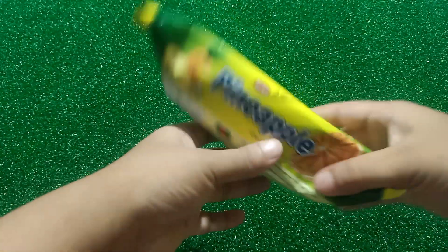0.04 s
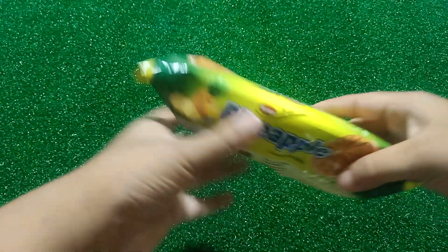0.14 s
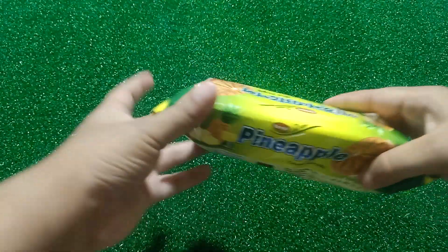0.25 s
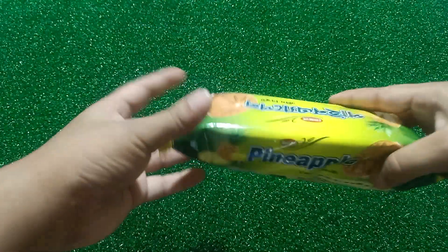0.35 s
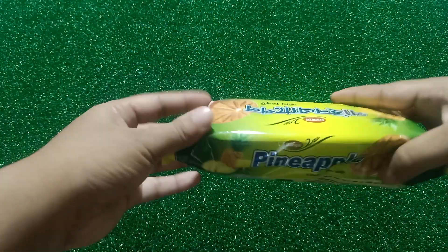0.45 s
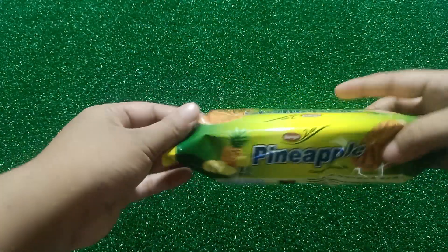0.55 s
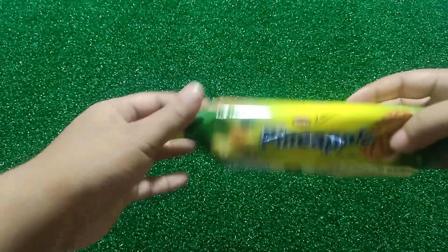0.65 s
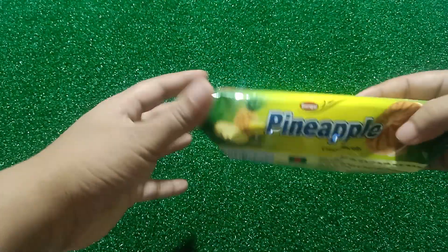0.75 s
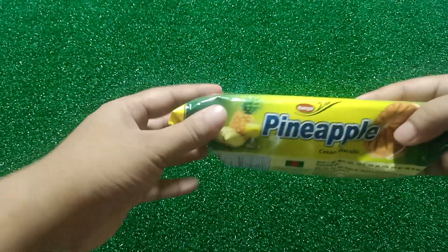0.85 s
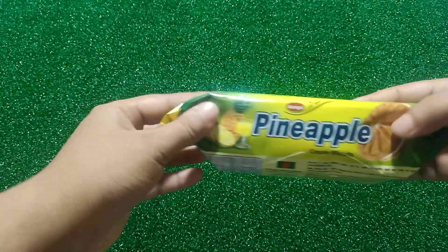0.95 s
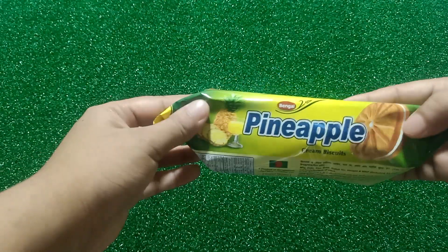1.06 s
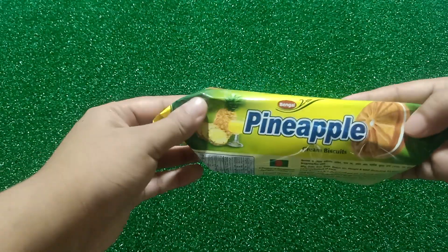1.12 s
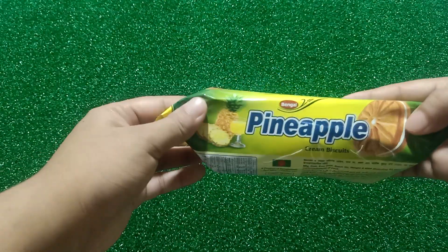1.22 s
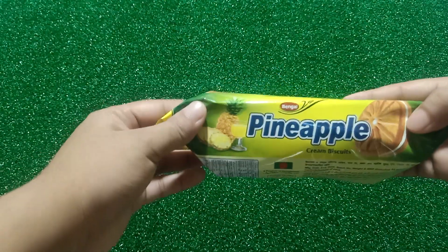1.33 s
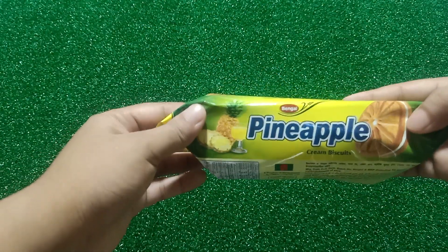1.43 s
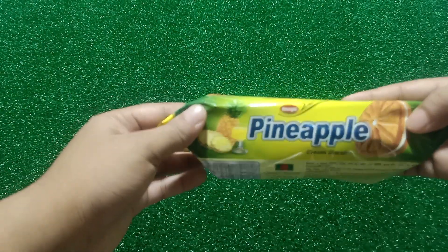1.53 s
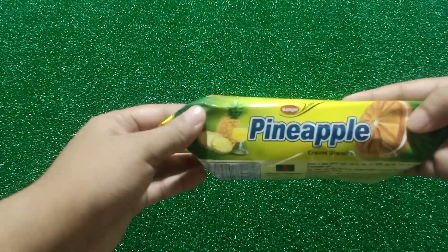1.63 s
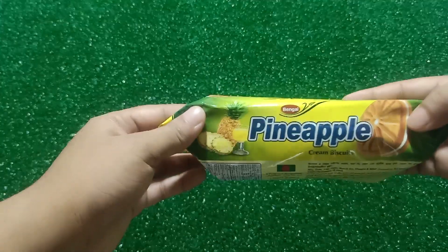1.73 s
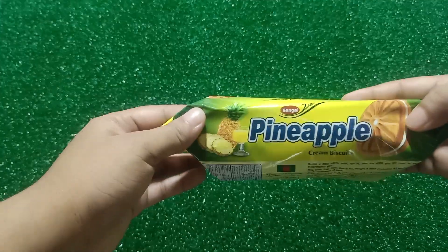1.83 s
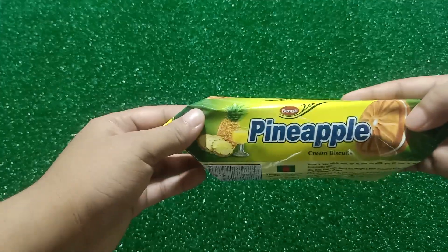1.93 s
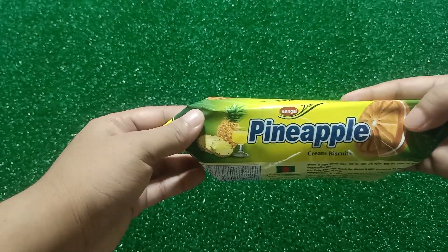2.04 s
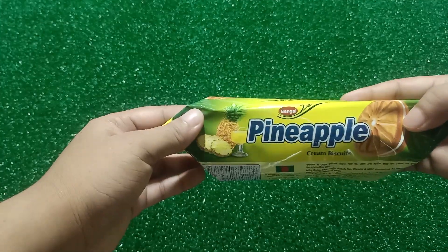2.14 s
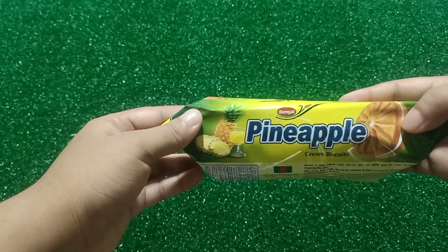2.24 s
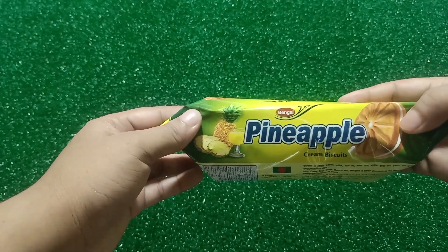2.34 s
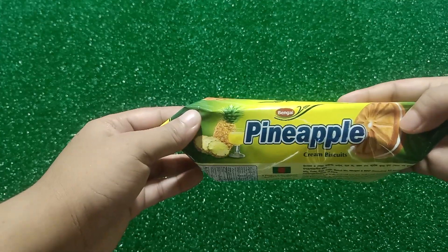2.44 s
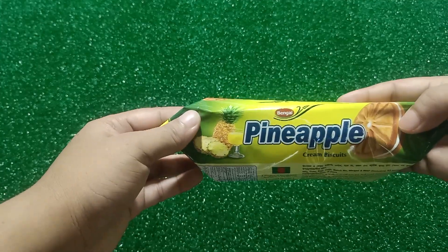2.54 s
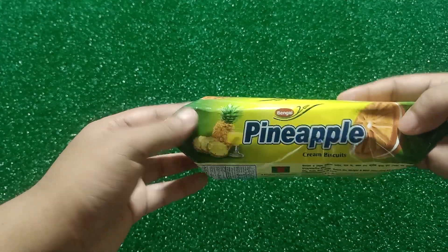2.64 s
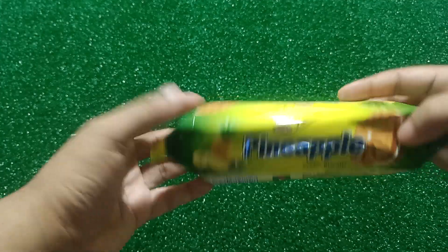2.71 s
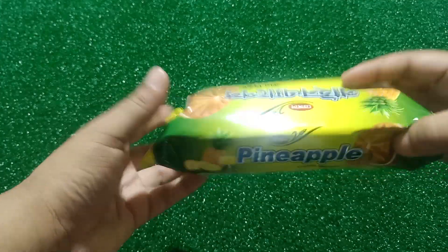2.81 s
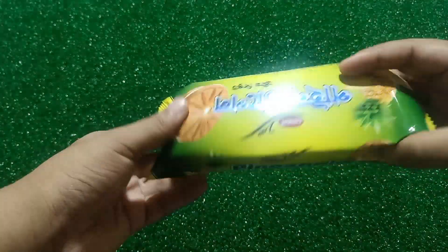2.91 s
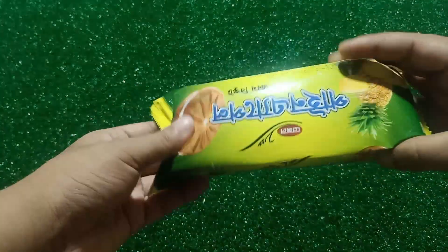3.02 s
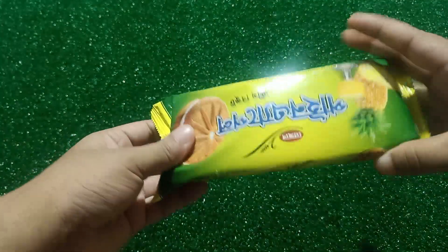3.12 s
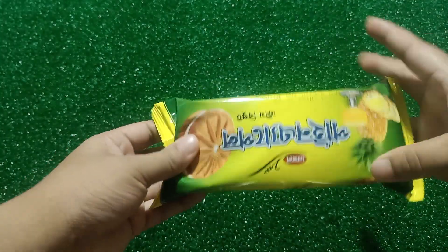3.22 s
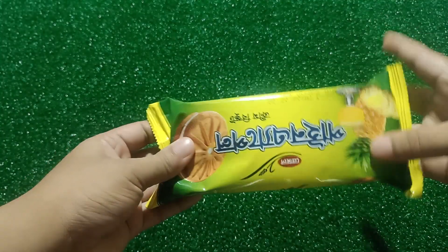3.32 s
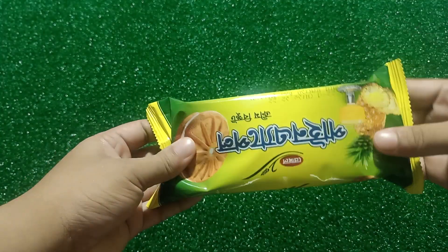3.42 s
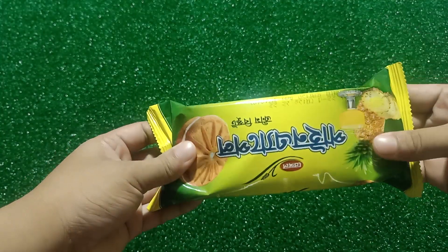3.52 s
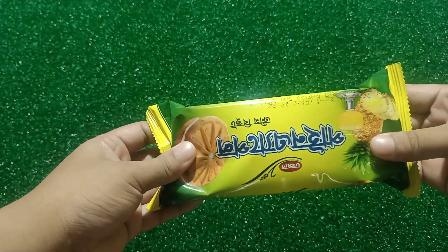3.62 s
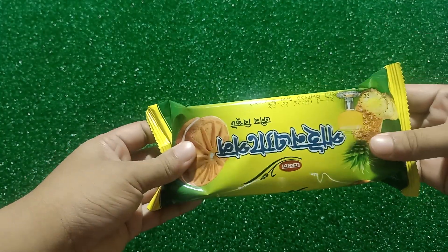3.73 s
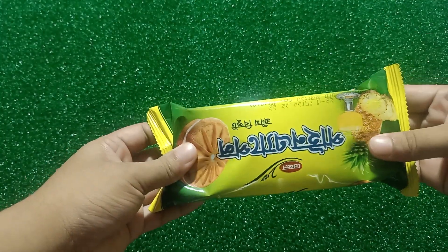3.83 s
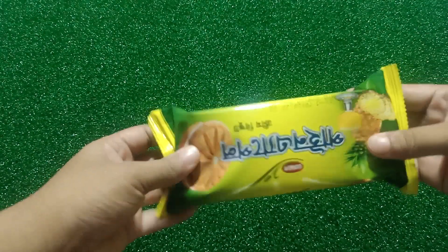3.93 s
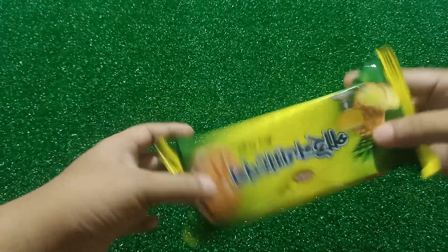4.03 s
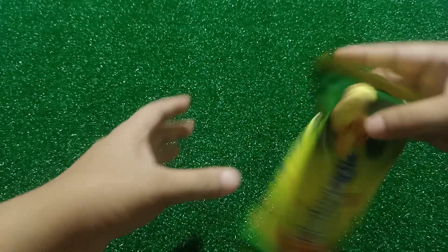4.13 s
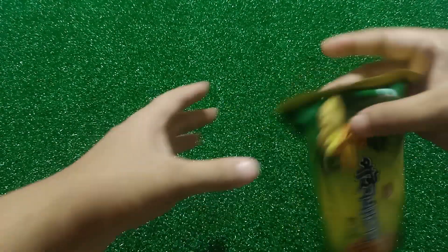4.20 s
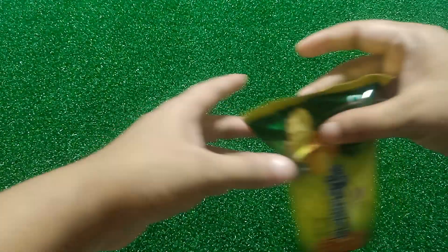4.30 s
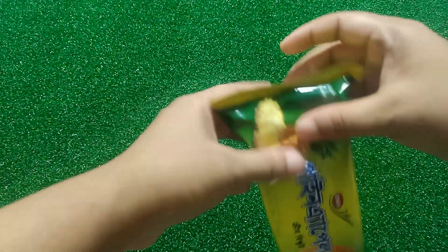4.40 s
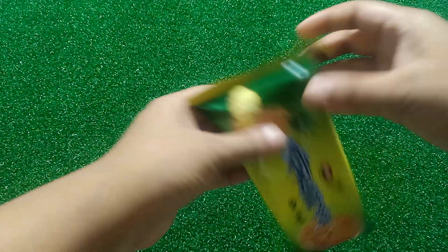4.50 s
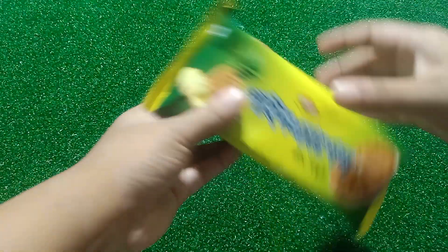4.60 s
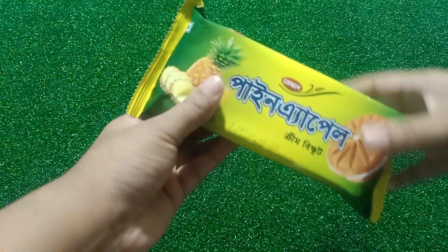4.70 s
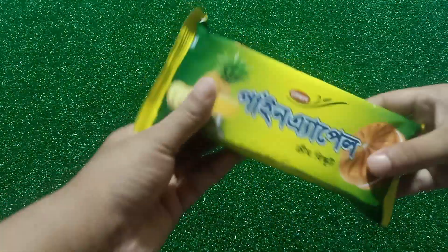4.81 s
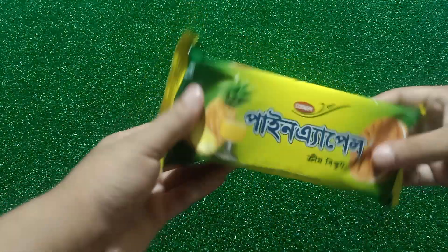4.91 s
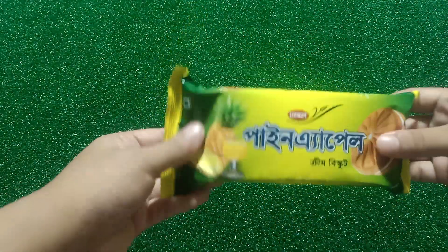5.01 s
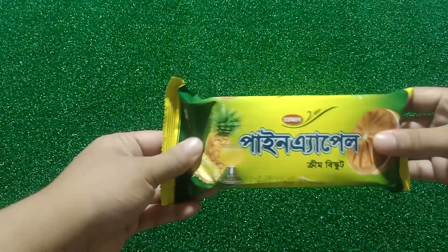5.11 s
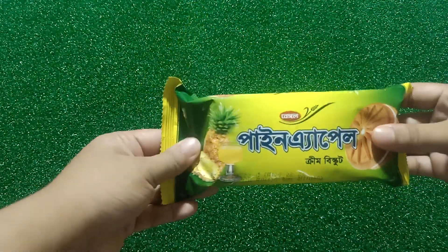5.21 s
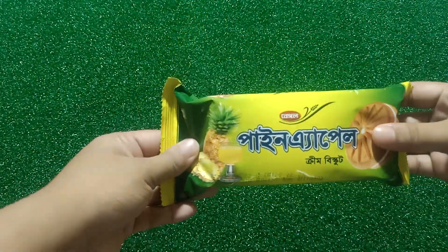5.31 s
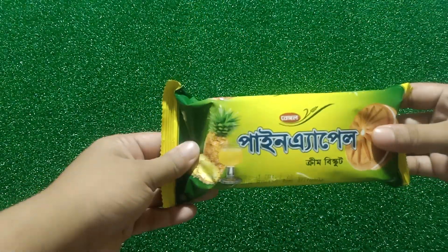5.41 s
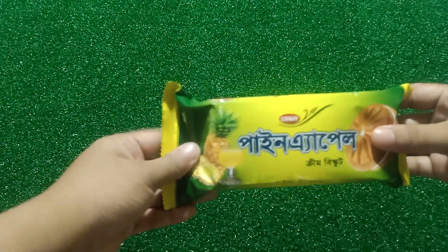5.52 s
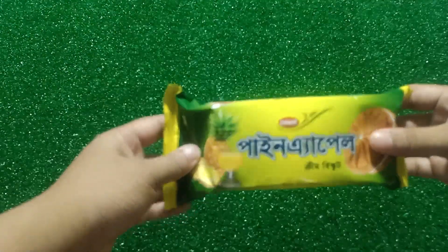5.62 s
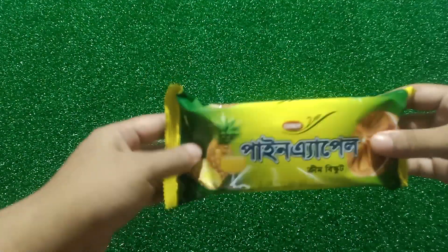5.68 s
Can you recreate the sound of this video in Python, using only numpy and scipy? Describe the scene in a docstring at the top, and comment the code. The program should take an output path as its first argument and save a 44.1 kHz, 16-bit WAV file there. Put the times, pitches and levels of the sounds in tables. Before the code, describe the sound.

A filled plastic biscuit packet is handled close to the microphone. Short papery snaps and fine crackles come at once and thin out after about a second; a near-quiet pause follows with faint ticks. Then a longer, denser, louder run of crinkling begins, easing into scattered snaps at the end. A small hard room adds a short tail above soft low rumble and thin hiss.

```python
"""Crackling biscuit wrapper

Hands turn a filled plastic wrapper close by, in bursts with pauses. The film buckles in short snaps
over a bed of tiny crackles, all shaped noise bursts; a small hard room answers with decaying noise.
Filtered noise makes a low rumble and thin hiss; wavering sines make faint whistles and a whine."""
import sys
import numpy as np
from scipy import signal
from scipy.fft import rfft, irfft, next_fast_len
from scipy.io import wavfile
from scipy.ndimage import uniform_filter1d, map_coordinates

SR = 44100
rng = np.random.default_rng(int(sys.argv[2]) if len(sys.argv) > 2 else 0)


def bounce(signal):
    """Save signal as a 16-bit WAV file at the path given by the first command-line argument."""
    frames = np.transpose(np.atleast_2d(signal))
    limited = np.clip(frames, -1, 1)
    pcm = np.round(limited * 32767).astype(np.int16)
    wavfile.write(sys.argv[1], SR, pcm)


N = 253575

# background noise spectra, relative: frequency_hz, density_db
RUMBLE_SPECTRUM = [(30, -39.5), (61, -13.5), (80, -18.5), (102, -4), (125, -12.5), (150, -5.5), (170, -9.5),
                   (205, -3), (297, -20), (398, -21), (550, -24), (700, -44)]
HISS_SPECTRUM = [(350, -29), (600, -4), (700, -8.5), (890, -3), (1050, -14.5), (2900, -13.5), (3600, -30),
                 (5600, -28), (7300, -30.5), (9000, -58), (12000, -79.5)]
# mean rumble level over time: time_s, level_db
RUMBLE_LEVEL = [(0, -56), (1.2, -54), (2.7, -57.5), (3.2, -53.5), (4.2, -59.5), (5.75, -55.5)]
# faint gliding whistles: start_s, end_s, start_pitch_hz, end_pitch_hz, mean_level_db
WHISTLES = [(1.405, 1.634, 3710, 3700, -77), (1.71, 2.018, 860, 925, -72.5), (2.45, 2.72, 6700, 6700, -94)]
# partials of a steady thin whine: pitch_hz, mean_level_db
WHINE = [(5395, -94), (5447, -92), (5495, -94)]
# reverberation time of the room: frequency_hz, t60_s
ROOM_T60 = [(300, 0.62), (1500, 0.37), (4000, 0.57), (8000, 0.47), (14000, 0.5)]
# colour of film and microphone together, relative: frequency_hz, density_db
COLOUR = [(180, -27), (300, -13.5), (496, -7), (660, -9.5), (1020, 3.5), (1270, 0.5), (1430, -5), (2480, 1),
          (3140, -7.5), (5550, -18), (6670, -11.5), (8440, -35), (10900, -46), (15200, -42.5), (16500, -45)]
# squeezes of the fingers, each a flurry of crackles: start_s, held_s, effort_db
SQUEEZES = [(0, .004, -34), (.06, 0.018, -38), (.14, 0.19, -53), (.48, .02, -42), (0.599, .03, -39),
            (0.659, .14, -39.5), (.95, 0.069, -51), (1.059, 0.073, -41.5), (1.198, 0.027, -49),
            (2.739, 0.12, -49.5), (2.86, 0.051, -42.5), (2.97, 0.18, -45.5), (3.1, .05, -37.5),
            (3.17, .05, -33.5), (3.28, 0.029, -35.5), (3.41, 0.043, -51.5), (3.54, 0.069, -45),
            (3.669, 0.01, -41.5), (4.052, 0.071, -36), (4.2, .03, -40.5), (4.244, .04, -32.5),
            (4.3, .04, -42.5), (4.462, 0.147, -37.5), (4.66, 0.213, -48), (4.891, 0.04, -39.5),
            (4.98, 0.13, -40.5), (5.23, 0.12, -45.5), (5.62, .04, -51.5), (5.72, .05, -45.5)]
# buckling snaps: start_s, middle_level_db (loudest millisecond), deep_above_middle_db, bright_above_middle_db
SNAPS = [(0.0516, -34.5, 3, 7.5), (0.0609, -30.5, 5.5, 7), (0.071, -24, -8, -12.5), (0.0779, -30, -7, -3.5),
         (0.1372, -35.5, 1, -2.5), (0.1542, -29, -5, -12.5), (0.1919, -36.5, 4.5, 3),
         (.2681, -22, -18, -16), (0.3153, -37.5, 1.5, -4), (0.328, -47.5, -9, 6), (.388, -44, -12, -3),
         (0.4182, -24, -7.5, -15), (.4283, -32.5, -5, -3), (0.4898, -21.5, -6, -10.5),
         (0.5965, -34.5, 0.5, -2.5), (0.6494, -27.5, -6, -9), (0.6703, -26, -1.5, -3.5),
         (0.7059, -33.5, 7.5, -3), (0.7373, -34, -1, -7), (.8294, -30.5, 2.5, -12), (0.9794, -40.5, 4.5, 4),
         (0.9858, -31.5, 2, -28), (1.0449, -24.5, -3.5, -5.5), (1.0882, -29, 3.5, -9.5),
         (1.1971, -39, 1.5, -5.5), (1.2376, -38, -4, -1.5), (1.285, -35.5, 2, -9.5), (1.4957, -58, -21, -1),
         (1.632, -46, -7.5, -28), (1.643, -45, -10, -20), (1.9075, -49, -12, 8.5), (1.96, -42.5, -17, 0),
         (2.386, -63, 17.5, -21), (2.397, -63, 4, 0), (2.705, -53.5, 0.5, -6), (2.7408, -50, 8.5, 12),
         (2.7763, -35.5, 4, -2.5), (2.7885, -29, -2, -4), (2.8, -33, -12, -1.5), (2.8558, -32, 1, -25.5),
         (2.8694, -27, 3.5, 0), (2.9, -36, -9, 1.5), (2.967, -35.5, -1, -8), (2.9763, -31.5, -9, -16),
         (3.0154, -31.5, -1, -1.5), (3.0988, -30.5, -5, -23), (3.1144, -27.5, -3, -13),
         (3.1613, -21.5, -5.5, -14), (3.1777, -19, 3, -9.5), (3.2127, -27.5, -4, -2.5),
         (3.261, -21.5, -2, -10), (3.2912, -23.5, -2, -14.5), (3.3, -27, 0.5, -8), (3.3522, -22, -3.5, -13),
         (3.4123, -35.5, -11, 12), (3.4268, -25.5, -9, -25), (3.4464, -29, -4.5, -11),
         (3.5205, -21.5, -9, -12.5), (3.5563, -34, -0.5, -5.5), (3.6608, -21, -11, -9.5),
         (3.6855, -32, 4, -1.5), (3.7776, -34.5, -6, -12), (3.9992, -33, -15, -13), (4.0335, -41, -7, -8),
         (4.0512, -33.5, -4.5, -9), (4.067, -38, 10.5, -6), (4.0859, -25.5, 3.5, -8.5),
         (4.2134, -28, -11, -5), (4.2565, -25.5, -0.5, -8.5), (4.2641, -22, 1, -11),
         (4.2897, -29, -6, -24.5), (4.3148, -31.5, 4.5, -5), (4.385, -26.5, -14, -11.5),
         (4.458, -36, -28, -14), (4.4684, -24.5, -6.5, -4.5), (4.4761, -31, 3, 1), (4.4904, -26.5, -3, -5),
         (4.5173, -26.5, 1, -18), (4.5503, -24, 1.5, -8.5), (4.5804, -28.5, 0, -1), (4.6083, -27.5, -4, -6),
         (4.664, -36, 4, -6), (4.703, -33, -0.5, -21), (4.7196, -36, -3, -6), (4.7756, -37, -2, -7.5),
         (4.7999, -38, 7.5, -2), (4.8285, -48.5, 17.5, -8), (4.8526, -45.5, 3, 4), (4.8924, -41.5, 7, 4),
         (4.9023, -41, 13.5, -14), (5.0238, -27, -3.5, -10.5), (5.082, -42, 10, -21),
         (5.1218, -27, -6, -14), (5.1595, -25, 5, 1), (5.2443, -32, -7, -9), (5.2936, -31, -8, -4),
         (5.3247, -26.5, -3.5, -4.5), (5.554, -41.5, 1.5, -5.5), (5.6036, -39, -3.5, 3),
         (5.6379, -42.5, -0.5, 2), (5.6487, -37.5, 0, -8), (5.7258, -33.5, 8, -7), (5.7364, -34, -1, -3)]

DEEP_HZ, BRIGHT_HZ = 1500, 4500  # borders of the deep, middle and bright registers
TOP_HZ = 16600  # upper band limit
GRIP_DB_PER_S, RELAX_DB_PER_S = 605.5, 192.5  # swell before a hold, settling after it


def amp(db):
    """Level to amplitude: 20 dB is a factor of ten."""
    return 10 ** (np.asarray(db) / 20)


def unit(x):
    """Normalisation to an rms of 1."""
    return x / np.sqrt(np.mean(x ** 2) + 1e-20)


def along(points, hz):
    """Interpolation of (frequency_hz, value) points on a logarithmic frequency axis."""
    f, v = np.transpose(points)
    return np.interp(np.log(hz + 1), np.log(f + 1), v)


def curve(rows, s):
    """Linear interpolation of a (time_s, value) table."""
    return np.interp(s, *np.transpose(rows))


def wobble(rate):
    """Slow random modulation: a smooth curve through `rate` random knots a second."""
    knots = rng.standard_normal(int(N * rate / SR) + 4)
    return map_coordinates(knots, [np.arange(N) * rate / SR])


def noise(points):
    """Spectral shaping: noise of rms 1 whose spectrum ends at its last point."""
    m = next_fast_len(N + 8192)
    hz = np.fft.rfftfreq(m, 1 / SR)
    gain = amp(along(points, hz)) * (hz < points[-1][0])
    return unit(irfft(rfft(rng.standard_normal(m)) * gain, m)[:N])


def ambience():
    """Filtered noise: a low rumble swells unevenly beneath a thin, nearly steady hiss."""
    rumble_db = curve(RUMBLE_LEVEL, np.arange(N) / SR) + 2 * wobble(7)
    hiss_db = -74 + 0.44 * wobble(2.8)
    return amp(rumble_db) * noise(RUMBLE_SPECTRUM) + amp(hiss_db) * noise(HISS_SPECTRUM)


def whistles():
    """Frequency glide: the integral of a changing pitch is the phase, here with random wavering."""
    t, out = np.arange(N) / SR, np.zeros(N)
    for start, end, from_hz, to_hz, db in WHISTLES:
        fade = np.clip(np.minimum(t - start, end - t) / 0.038, 0, 1)
        pitch_hz = np.interp(t, [start, end], [from_hz, to_hz])
        phase = 2 * np.pi * np.cumsum(pitch_hz) / SR
        out += fade * amp(db + 3.9 * wobble(20)) * np.sin(phase + 1.3 * wobble(40))
    return out


def whine():
    """Random amplitude and phase modulation: close thin tones flicker throughout."""
    t, out = np.arange(N) / SR, np.zeros(N)
    for hz, db in WHINE:
        out += amp(db + 3 * wobble(8)) * np.sin(2 * np.pi * hz * t + 2.5 * wobble(25))
    return out


def room(x, part=.12):
    """Reverberation: the walls answer after 4 ms, duller, as noise decaying at each frequency's t60."""
    out, step = np.zeros(N + SR), int(part * SR)
    # each part (s) gets a freshly drawn random tail, so no single tail's colouring repeats
    for start in range(0, N, step):
        hz, t, z = signal.stft(rng.standard_normal(int(.6 * SR)), SR, nperseg=256)
        decay_db = -60 * t / along(ROOM_T60, hz)[:, None]
        dulling_db = -2 * (hz[:, None] / 8000) ** 2
        tail = signal.istft(z * amp(decay_db + dulling_db), SR, nperseg=256)[1]
        tail *= np.clip((np.arange(len(tail)) / SR - .004) / 0.00067, 0, 1)
        wet = signal.fftconvolve(x[start:start + step], tail / np.linalg.norm(tail))
        out[start:start + len(wet)] += wet
    return out[:N]


def causal(points, size=4096):
    """Minimum phase: folding the cepstrum gives a (frequency_hz, db) spectrum its causal response."""
    cep = irfft(np.log(amp(along(points, np.fft.rfftfreq(size, 1 / SR))) + 1e-6))
    cep[1:size // 2] *= 2
    cep[size // 2 + 1:] = 0
    return irfft(np.exp(rfft(cep)))


def registers():
    """Band splitting: the film and microphone response parts into deep, middle and bright."""
    whole = causal(COLOUR)
    cuts = [(DEEP_HZ, "low"), ([DEEP_HZ, BRIGHT_HZ], "band"), (BRIGHT_HZ, "high")]
    responses = []
    for hz, kind in cuts:
        sos = signal.butter(4, hz, kind, fs=SR, output="sos")
        responses.append(signal.sosfilt(sos, whole)[:400])
    return np.array(responses)


def bursts(times, levels_db, t60, rise):
    """Damped impulses: each register of a noise burst rises, then decays exponentially (t60, rise in s)."""
    t = np.arange(300) / SR
    life = t60[:, None, None] * np.array([[1.2], [1], [.55]])  # treble dies first
    shape = amp(-60 * t / life) * (1 - np.exp(-(t + 1 / SR) / rise))
    grains = rng.standard_normal(shape.shape) * shape
    parts = signal.fftconvolve(grains, registers()[None], axes=2)
    # each register is levelled by its loudest millisecond
    power = uniform_filter1d(parts ** 2, size=44, axis=2)
    parts /= np.sqrt(np.max(np.abs(power), axis=2, keepdims=True))
    sound = np.sum(parts * amp(levels_db)[:, :, None], axis=1)
    # overlapping bursts add up at their sample positions
    where = np.round(times * SR).astype(int)[:, None] + np.arange(sound.shape[1])
    return np.bincount(where.ravel(), sound.ravel(), N + SR)[:N]


def effort(s):
    """Dominance of the strongest: squeezes swell, hold and settle; the highest dB at each moment rules."""
    start, held, db = np.transpose(SQUEEZES)[:, :, None]
    before = np.maximum(start - s, 0)
    after = np.maximum(s - start - held, 0)
    return np.max(db - GRIP_DB_PER_S * before - RELAX_DB_PER_S * after, axis=0)


def crackle(count=2200):
    """Superposition of tiny creases: unequal sizes and colours, swelling with each squeeze."""
    draw = rng.random((count, 3))
    tint = rng.standard_normal((count, 3))
    s = draw[:, 0] * (N - 1) / SR
    clump_db = 3.5 * wobble(60)[(s * SR).astype(int)]
    size_db = np.minimum(clump_db - 5.5 * np.log(1 - draw[:, 1]), 12)  # few large, many small
    register_db = np.array([-11, -11, -18]) + 4.34 * tint  # deep, middle, bright
    levels_db = (effort(s) + size_db)[:, None] + register_db
    return bursts(s, levels_db, .004 + .007 * draw[:, 2], rise=.0003)


def snaps():
    """Buckling: each crease flips over in a few ms; wide creases sound deep, tight ones bright."""
    s, db, deep_db, bright_db = np.transpose(SNAPS)
    levels_db = np.transpose([db + deep_db, db, db + bright_db])
    return bursts(s, levels_db, np.full(len(s), .011), rise=0.0011)


def scene():
    """Superposition: the film's direct sound, its reverberation and the background add linearly."""
    film = snaps() + crackle()
    return (film + amp(-9.5) * room(film) + ambience() + whistles() + whine())[None]


def record(dry):
    """Band limitation: an ideal low-pass keeps nothing at or above TOP_HZ."""
    m = next_fast_len(N + 8192)
    passed = np.fft.rfftfreq(m, 1 / SR) < TOP_HZ
    return irfft(rfft(dry, m) * passed, m)[:, :N]


dry = scene()
out = record(dry)
bounce(out)
```